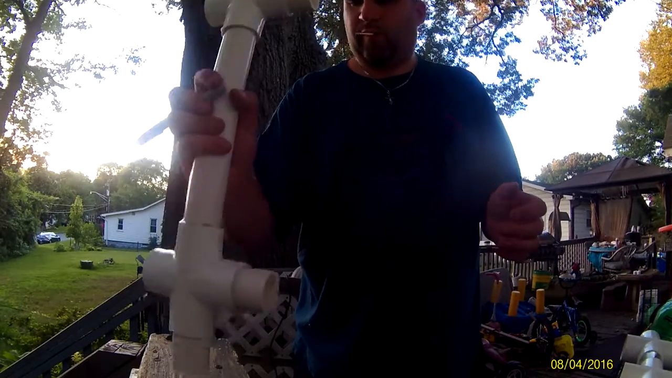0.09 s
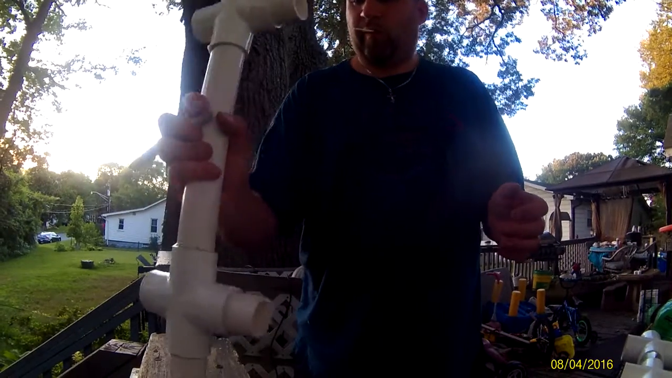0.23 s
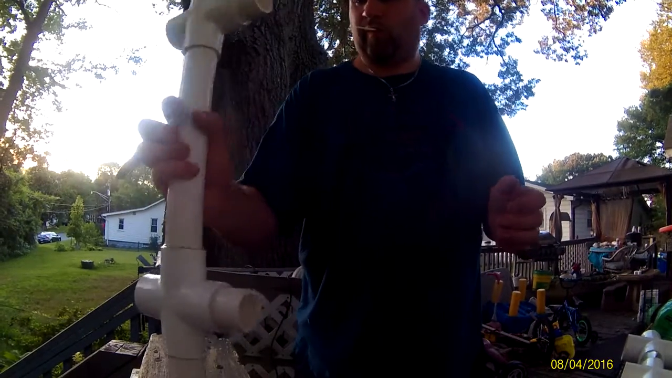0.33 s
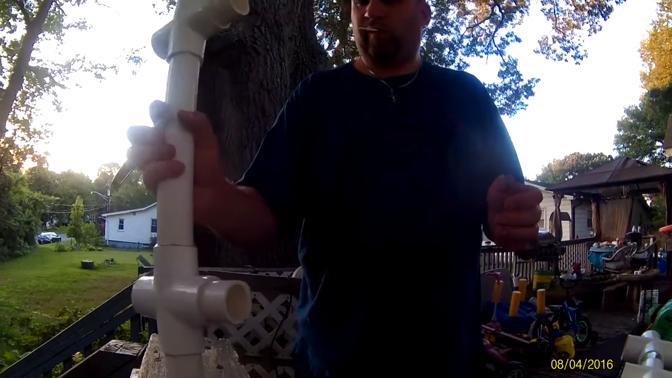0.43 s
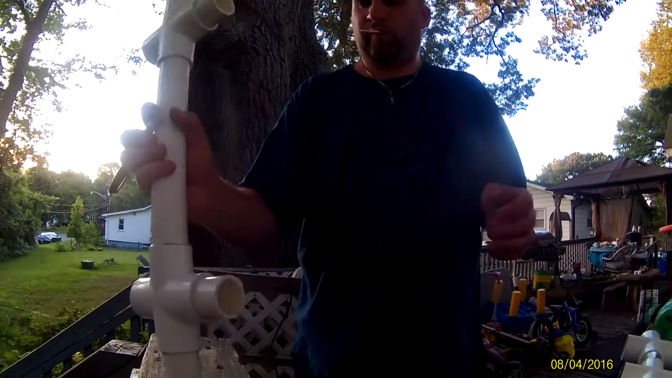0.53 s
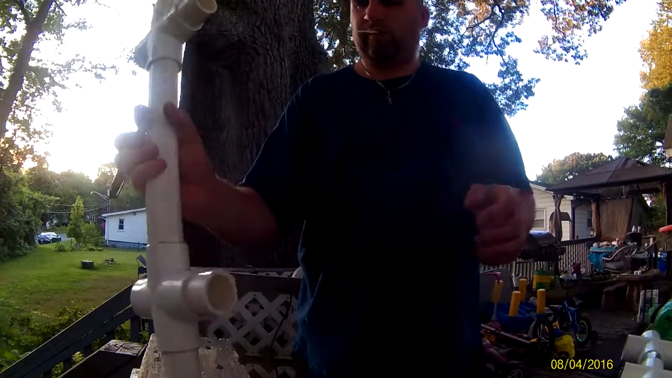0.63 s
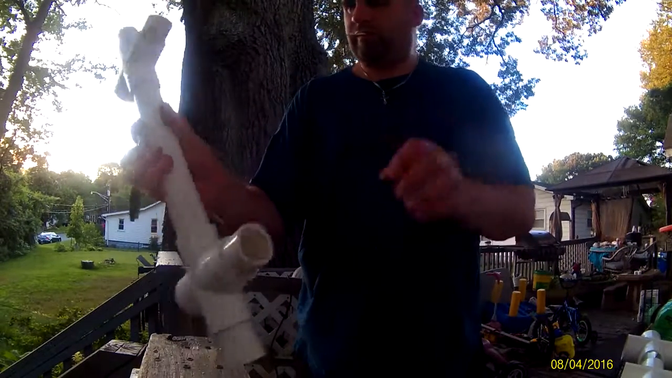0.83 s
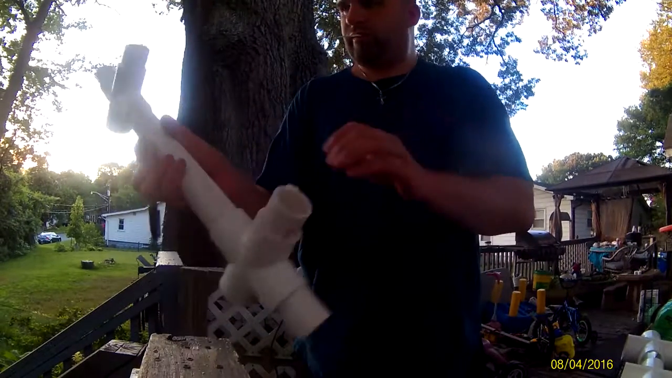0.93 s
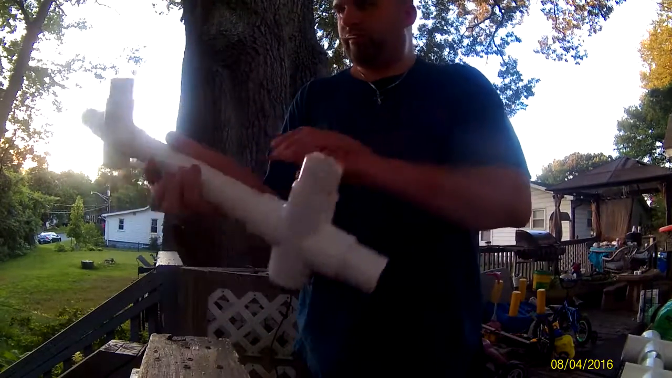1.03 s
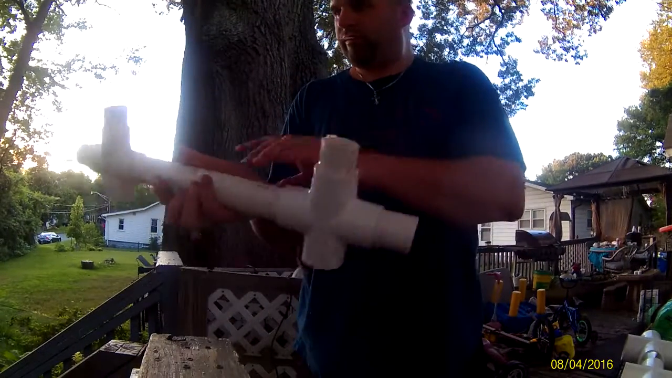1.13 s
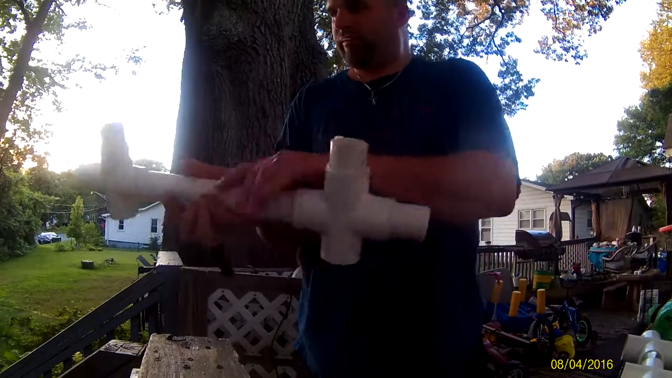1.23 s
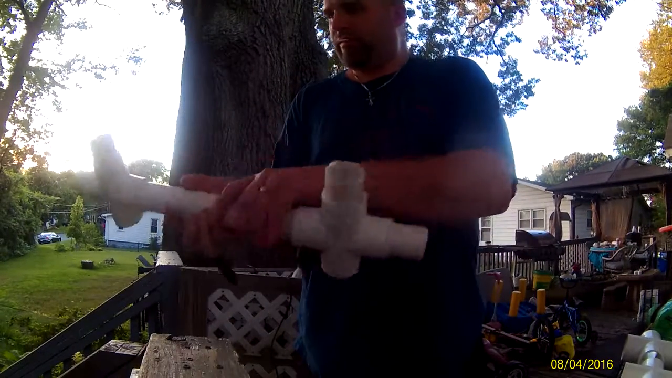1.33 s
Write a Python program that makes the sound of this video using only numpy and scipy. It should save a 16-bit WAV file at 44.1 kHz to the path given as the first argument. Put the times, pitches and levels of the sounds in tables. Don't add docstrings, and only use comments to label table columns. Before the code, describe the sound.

A hollow plastic pipe frame slams onto deck boards very close to a small camera microphone, distorting, with quick bounces and fitting clicks; pipe tones fade into faint outdoor rumble, pulsing insects and thin whine.

```python
import sys
import numpy as np
from scipy import signal
from scipy.io import wavfile
from scipy.ndimage import uniform_filter1d

SR = 44100
rng = np.random.default_rng(int(sys.argv[2]) if len(sys.argv) > 2 else 0)


def output_pcm(signal):
    pcm = np.clip(np.atleast_2d(signal).T, -1, 1) * 32767
    wavfile.write(sys.argv[1], SR, np.round(pcm).astype(np.int16))


def gain_from_db(level_db):
    decades = np.asarray(level_db, float) / 20
    return 10 ** decades


N = 59535


def evened(x):
    return x / np.sqrt(np.mean(x ** 2) + 1e-20)


def add(mix, s, sound):
    part = mix[round(s * SR):][:len(sound)]
    part += sound[:len(part)]


def resonate(x, hz, width):
    turn = np.exp(2j * np.pi * hz * np.arange(len(x)) / SR)
    r = np.exp(-np.pi * width / SR)
    return 2 * (turn * signal.lfilter([1 - r], [1, -r], x / turn)).real


def lowpass(x, hz):
    return signal.lfilter(*signal.butter(2, hz, fs=SR), x)


def edge(x, hz):
    return signal.oaconvolve(x, signal.firwin(255, hz, window=("kaiser", 8), fs=SR), "same")


def blows():
    # start in seconds, strength in dB,
    # favoured pitch in Hz, spread around it in octaves, ring time as a share of the full one.
    blow_rows = [(0.2274, 13, 950, 0.55, 0.36), (.2283, 21.5, 487, 1.4, .62), (.2312, 16, 520, 0.63, 0.83),
                 (0.2353, 12, 307.5, 0.72, 0.38), (0.2389, 11.5, 1169, 0.97, 0.36),
                 (0.2439, 1, 380.3, 1.1, 0.53), (0.2457, -13, 1265, 0.41, 0.56),
                 (.2540, -12.5, 608, .9, 1.0), (.2620, -12, 517, .7, 2.8),
                 (0.2757, -17.5, 258.3, 0.98, 1.0), (0.2848, 8.5, 891, 0.34, .5),
                 (.2880, -13, 1600, 0.75, 1.1), (0.293, -8.5, 340, 0.15, 1.45),
                 (.2962, -0.5, 728, 0.41, 0.6), (0.3015, -3.5, 1220, 1.4, 0.27),
                 (0.307, -16.5, 500, 1.2, 0.58), (.3200, -10.5, 846, 0.48, 0.33),
                 (0.3354, -14, 1520, 0.49, 0.38), (.3358, -20, 720, 0.43, 0.63),
                 (0.3388, -21.5, 340, 0.37, 0.36), (.3690, -27.5, 334, 0.48, 0.51)]
    # pitch in Hz, level in dB, time to fade by 60 dB in seconds.
    body_tones = [(139, 3, .1), (239, -14, 0.078), (300.5, 2.5, .065), (340, -4.5, 0.061),
                  (407.7, -2, 0.039), (536.2, -0.5, 0.043), (720, 0.5, 0.048), (877, -3.5, 0.052),
                  (1075, -1.5, .035), (1226.7, 4.5, 0.051), (1320, -13, 0.041), (1605, -9, 0.054),
                  (2030, -16, 0.035), (2470, -18.5, .022)]
    soft_s, scatter_db, detune = 0.0009, 1.0, 0.017
    out = np.zeros(N)
    t = np.arange(8000) / SR
    chance = rng.standard_normal((len(blow_rows), 2, len(body_tones)))
    for (s, db, centre_hz, octaves, share), (level_luck, pitch_luck) in zip(blow_rows, chance):
        ring = np.zeros(len(t))
        for (hz, tone_db, t60), louder, sharper in zip(body_tones, level_luck, pitch_luck):
            favour_db = -10 * (np.log2(hz / centre_hz) / octaves) ** 2
            fade_db = -60 * t / (t60 * share)
            level = gain_from_db(tone_db + favour_db + scatter_db * louder + fade_db)
            ring += level * np.sin(2 * np.pi * hz * (1 + detune * sharper) * t)
        onset = 1 - np.exp(-(t / soft_s) ** 2)
        add(out, s, gain_from_db(db) * onset * ring / 3)
    return out


def ticks():
    # start in seconds, strength in dB, tilt above 5 kHz in dB per octave (negative is duller).
    tick_rows = [(0.228, -1, -2.5), (0.2318, 2.5, 0.5), (0.2354, -8.5, -1.5), (.2410, -17, -5.5),
                 (.2450, -10, -2), (0.247, -33.5, -1), (.2503, -30.5, -1), (.2550, -33, -0.5),
                 (0.2583, -25, -2), (0.2621, -50, -5), (0.2632, -38, -2.5), (0.272, -53, -9.5),
                 (0.2767, -28.5, -3.5), (0.285, -30.5, -2), (0.288, -49.5, -8.5), (.2945, -32.5, -22),
                 (0.2964, -36.5, -9), (0.3, -38.5, -20), (.3040, -39, -8)]
    # pitch in Hz, width in Hz, level in dB.
    wall_tones = [(2930, 900, -0.5), (4175, 660, -6.5), (4983, 2400, -2.5), (6503, 360, -8),
                  (8032, 1400, -7.5), (10300, 2000, -14), (14860, 1100, -29.5)]
    t60, rise_s, grit = 0.01, 0.0005, 0.79
    out = np.zeros(N)
    t = np.arange(1200) / SR
    shape = (1 - np.exp(-t / rise_s)) * gain_from_db(-60 * t / t60)
    for s, db, tilt_db in tick_rows:
        luck = rng.standard_normal(len(t))
        ring = np.zeros(len(t))
        for k, (hz, width, tone_db) in enumerate(wall_tones):
            level = gain_from_db(tone_db + tilt_db * np.log2(max(hz, 5000) / 5000))
            tone = np.sin(2 * np.pi * (hz * (1 + 0.03 * luck[-1 - k]) * t + luck[k]))
            scrape = evened(resonate(resonate(luck, hz, width), hz, width))
            ring += level * shape * (tone + grit * scrape)
        add(out, s, gain_from_db(db) * ring / abs(ring).max())
    return out


def columns():
    # pitch in Hz, level after the slam in dB, level left from the earlier knock in dB,
    # time to fade by 60 dB in seconds.
    air_tones = [(273, -44, -60, .4), (382, -43.5, -60.5, 0.33), (453.4, -26, -50, 0.41),
                 (639.3, -31.5, -42, .62), (1325, -33, -60, 0.39)]
    slam_s = 0.236
    t = np.arange(N) / SR
    since = np.maximum(t - slam_s, 0)
    out = np.zeros(N)
    for hz, db, old_db, t60 in air_tones:
        old = gain_from_db(old_db - 60 * t / t60) * np.sin(2 * np.pi * (hz * t + rng.random()))
        new = gain_from_db(db - 60 * since / t60) * np.sin(2 * np.pi * hz * since)
        out += old * (since == 0) + new
    return out


def deck(x):
    t60, level_db, dull_hz = 0.2, -25.5, 1220
    t = np.arange(SR // 2) / SR
    hits = (rng.random(len(t)) < 0.05) * (t > 0.004)  # sparse, none in the first 4 ms
    echoes = lowpass(rng.choice([-1., 1.], len(t)) * hits, dull_hz) * gain_from_db(-60 * t / t60)
    return gain_from_db(level_db) * signal.fftconvolve(x, echoes / np.linalg.norm(echoes) / 4)[:N]


def earlier_thud():
    level_db, t60 = -66, 0.4
    thud = evened(resonate(rng.standard_normal(N), 400, 390))
    return gain_from_db(level_db - 60 * np.arange(N) / SR / t60) * thud


def insects():
    # time in seconds, level in dB.
    chorus_levels = [
        (0, -82),
        (.08, -76.5),
        (.16, -74),
        (.25, -75.5),
        (.36, -76),
                     (0.4, -81.5), (0.418, -75), (0.43, -73), (0.626, -76), (0.638, -78), (0.696, -74.5),
                   (0.836, -73.5), (0.922, -79), (1.084, -72), (1.188, -75), (1.212, -76), (1.35, -76)]
    # pitch in Hz, width in Hz, level in dB.
    song_bands = [(6583, 480, 2), (6772, 420, 1), (5776, 200, -3)]
    throbs_per_s, throb_depth = 100, 0.5
    t = np.arange(N) / SR
    wander = evened(lowpass(rng.standard_normal(N), 9.9))
    turns = np.cumsum(throbs_per_s * (1 + 0.25 * wander)) / SR
    drive = rng.standard_normal(N) * (1 + throb_depth * np.cos(2 * np.pi * turns))
    song = np.zeros(N)
    for hz, width, db in song_bands:
        song += gain_from_db(db) * evened(resonate(resonate(drive, hz, width), hz, width))
    times, levels_db = np.transpose(chorus_levels)
    return gain_from_db(np.interp(t, times, levels_db) + 5.5) * evened(song)


def whine():
    pitch_hz, level_db = 13363.9, -72.8
    flips_per_s, flip_at_s = 82.43, 0.5063
    jump_hz, jump_db = 330, -4
    t = np.arange(N) / SR
    jump = (t > 0.953) & (t < 0.969)
    flips = np.sign(np.sin(np.pi * flips_per_s * (t - flip_at_s)))
    tone = np.sin(2 * np.pi * np.cumsum(pitch_hz + jump_hz * jump) / SR)
    return np.sqrt(2) * gain_from_db(level_db + jump_db * jump) * flips * tone


def yard():
    # frequency in Hz, level in dB.
    colour = [(8, 0), (45, 1.5), (250, -6.5), (400, -10), (1500, -20.5), (4500, -30.5), (10000, -33.5),
              (16300, -32)]
    level_db, patch_db = -57, 0.9
    frames, bins_hz = N // 256 + 5, np.fft.rfftfreq(1024, 1 / SR)
    real, imaginary, patches = rng.standard_normal((frames, 513, 3)).T
    patches = evened(uniform_filter1d(uniform_filter1d(patches, 10, 0), 10, 1))
    hz, db = np.transpose(colour)
    colour_db = np.interp(np.log(bins_hz + 1), np.log(hz + 1), db)[:, None]
    spectrum = (real + 1j * imaginary) * gain_from_db(colour_db + patch_db * patches)
    wash = signal.istft(spectrum, nperseg=1024, noverlap=768)[1][:N]
    return gain_from_db(level_db) * evened(wash)


def scene():
    knocks = blows() + ticks()
    echoes = deck(np.clip(knocks, -1, 1))
    far = edge(yard() + earlier_thud() + insects() + whine(), 15800)
    return (knocks + echoes + columns() + far)[None]


def low_pass(x):
    return signal.sosfilt(signal.butter(12, 16540, fs=SR, output="sos"), x)


def record(dry):
    clip_level, sag_hz = 0.7, 14
    clipped = np.clip(dry[0], -clip_level, clip_level)
    sagged = signal.lfilter(*signal.butter(1, sag_hz, "high", fs=SR), clipped)
    return low_pass(edge(sagged, 16300)[None])


dry = scene()
out = record(dry)
output_pcm(out)
```